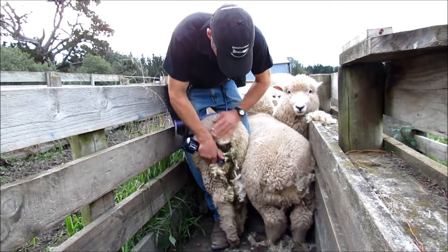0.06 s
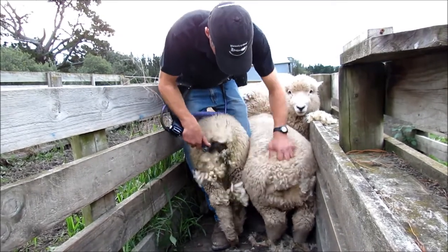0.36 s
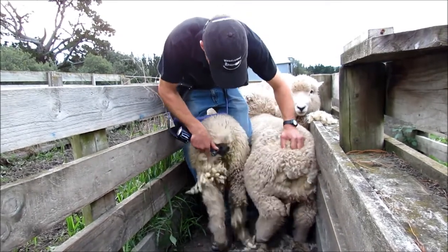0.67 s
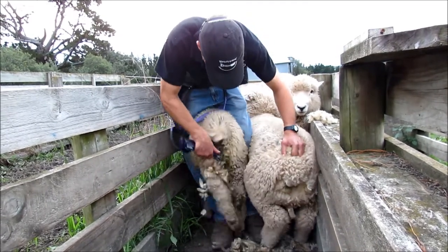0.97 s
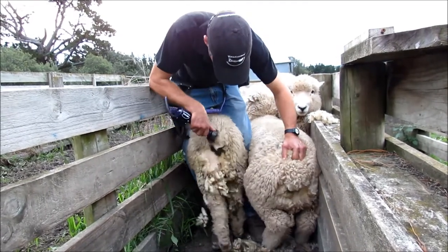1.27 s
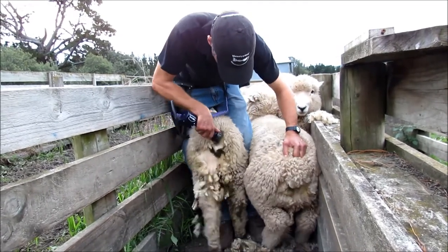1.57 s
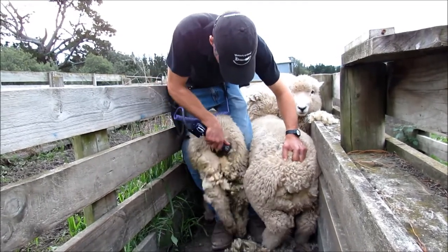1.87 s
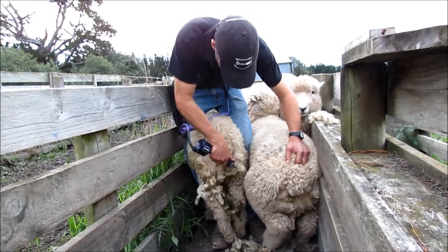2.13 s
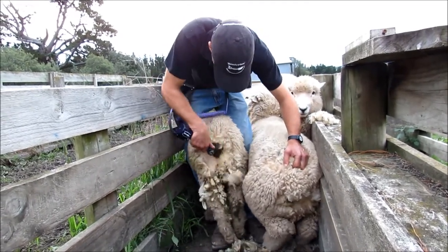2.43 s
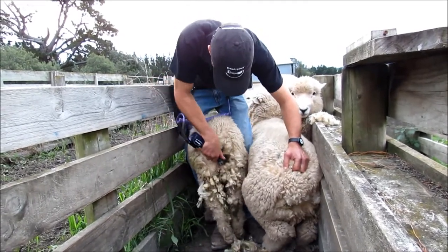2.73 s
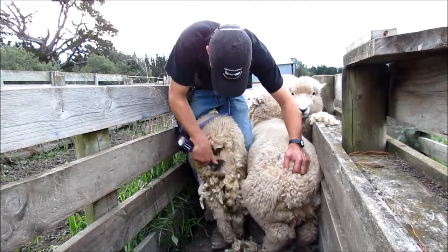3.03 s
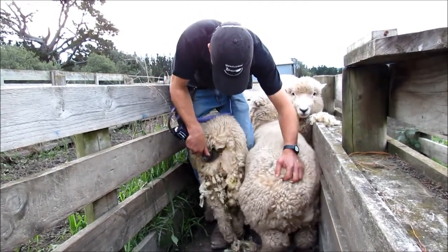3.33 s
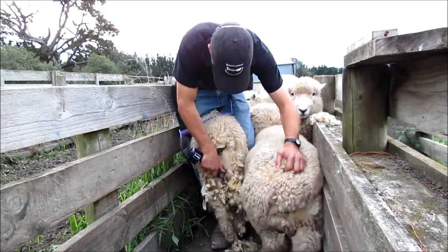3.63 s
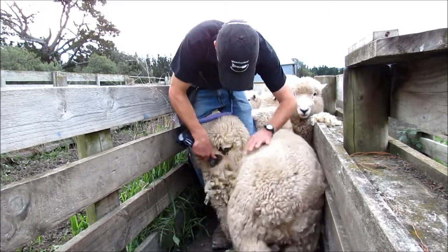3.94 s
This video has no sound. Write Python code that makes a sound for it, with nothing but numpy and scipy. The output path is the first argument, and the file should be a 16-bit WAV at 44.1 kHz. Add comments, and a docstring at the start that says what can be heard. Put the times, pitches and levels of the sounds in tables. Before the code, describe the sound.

An electric clipper buzzes and hisses steadily outdoors, rasping harshly at times as it bites into thick wool. After about a second come a sharp blade snap and a few thumps on wooden boards, while sheep shuffle faintly.

```python
"""Outdoor wooden sheep race: an electric clipper works through a fleece at about 48 strokes a second.
The cutter hisses over the comb and rings its teeth; thick wool slows the motor and adds harsh chatter.
The drive knocks at each reversal, the gears hum, and the blades snap twice.
Sheep thump the boards and shuffle. Behind: low rumble and one soft gust on the microphone."""
import sys
import numpy as np
from scipy import signal
from scipy.fft import rfft, irfft
from scipy.io import wavfile
from scipy.ndimage import map_coordinates

SR = 44100
rng = np.random.default_rng(int(sys.argv[2]) if len(sys.argv) > 2 else 0)


def unload_wav(signal):
    """Save mono or channel-first audio to the path in sys.argv[1] as 16-bit WAV at rate SR, clipped to [-1, 1]."""
    wavfile.write(
        sys.argv[1],
        SR,
        np.round(np.clip(np.atleast_2d(signal).T, -1, 1) * 32767).astype(np.int16),
    )


N = 176400
T = np.arange(N) / SR
HZ = np.fft.rfftfreq(N, 1 / SR)

# Motor speed. Each row: time in seconds, strokes per second.
STROKE_RATE = [(0, 48.3), (0.15, 49.1), (0.4, 48.3), (0.66, 48.7), (0.81, 47.5), (0.93, 49.6), (1.05, 48.5),
               (1.28, 48.2), (1.37, 48.8), (1.46, 48.1), (1.55, 48.5), (1.9, 48), (2.05, 49.1),
               (2.14, 50.1), (2.26, 48.4), (2.53, 48.25), (2.62, 48.8), (2.81, 47.1), (2.97, 52),
               (3.06, 50.4), (3.14, 48.2), (3.4, 48.5), (3.53, 48), (3.71, 49.35), (3.88, 48.15), (4, 48.8)]
# Moving handpiece. Each row: time in seconds, then relative hiss, comb ring and knock levels in dB.
HANDPIECE_LEVELS = [(0, -22.5, -33, -33), (0.16, -23, -28, -37.5), (0.33, -18, -21, -30.5),
                    (0.56, -19, -29, -34.5), (0.66, -21.5, -21, -32.5), (0.78, -20.5, -27, -37),
                    (0.89, -25, -30.5, -33.5), (1.0, -21.5, -26, -33.5), (1.15, -20.5, -23.5, -28),
                    (1.27, -22.5, -27.5, -33.5), (1.55, -23, -27, -31), (1.75, -21.5, -26.5, -34.5),
                    (1.95, -25.5, -32, -30), (2.17, -25.0, -33, -41.5), (2.37, -20.5, -25.5, -31),
                    (2.56, -22, -27, -31), (2.71, -23, -21, -30), (2.85, -25.5, -41, -49),
                    (2.97, -26, -32, -37), (3.1, -22, -27.5, -33.5), (3.35, -20.5, -24.4, -31.5),
                    (3.52, -22.5, -27, -40), (3.66, -23, -30, -31), (3.84, -19, -24.5, -31.5),
                    (4.0, -19.5, -26, -29)]
# Blade hiss. Each row: frequency in Hz, gain in dB.
HISS_SPECTRUM = [(400, -65), (620, -12), (760, -6), (1700, -8.5), (2050, -4.5), (2500, -6.5), (2900, -4),
                 (3300, -5.5), (3460, -15.5), (3600, -8), (3780, -7), (6400, -6.5), (7400, -3.5),
                 (10200, -1), (13400, -9), (16000, -11.5)]
# Left-right likeness of the hiss. Each row: frequency in Hz, correlation from 0 to 1.
HISS_CORRELATION = [(1000, 0.41), (2500, 0.12), (5000, 0.57), (8000, 0.04)]
# Comb modes, upper then lower. Each row: pole width in Hz, gain in dB, dB per dB of ring level change.
COMB_MODES = [(536, -3, 1.15), (368, -6, 0.81)]
# Comb modes shift under pressure on the fleece. Each row: time in seconds, upper and lower pitch in Hz.
COMB_PITCHES = [(0.0, 5500, 4540), (0.22, 5560, 4750), (0.36, 5100, 4670), (0.53, 5510, 4360),
                (0.61, 5180, 4860), (0.9, 5440, 4390), (2.76, 5210, 4590), (2.92, 5400, 4350),
                (3.14, 5260, 4750), (3.7, 5320, 4830), (4.0, 5220, 4870)]
# Bites into thick wool. Each row: start in seconds, length in seconds, level in dB.
WOOL_BITES = [(0.736, 0.15, -23.5), (1.706, 0.12, -30.5), (1.818, 0.3, -24), (2.662, 0.22, -23),
              (3.493, 0.14, -27.5)]
# Tearing wool. Each row: frequency in Hz, gain in dB.
TEAR_SPECTRUM = [(300, -13.5), (780, -7.5), (2850, -2.5), (6500, -5.5), (8100, 3), (14000, -9.5)]
# Cutter scrapes. Each row: start in seconds, length in seconds, level in dB, pitch in Hz.
COMB_SCRAPES = [(0.185, 0.2, -35.5, 2780), (2.74, .17, -37, 2750), (3.546, 1, -37, 2850)]
# Housing resonances. Each row: frequency in Hz, width in Hz, gain in dB.
HOUSING_MODES = [(751, 14, 0), (1011, 18.6, 3.5), (1202, 110, 2.5), (1712, 42, 5.5), (2110, 92, -2.5),
                 (2836, 79, 1.5)]
# Thumps on the boards. Each row: start in seconds, level in dB, main pitch in Hz, its T60 in seconds.
BOARD_THUMPS = [(1.126, -27, 324, 0.021), (1.261, -21, 346, 0.063), (1.264, -25, 385, 0.055),
                (1.546, -23, 365, 0.018), (1.579, -26, 168, 0.046)]
# Board resonances. Each row: multiple of the main pitch, gain in dB.
BOARD_MODES = [(.55, -13.5), (1, 2.5), (1.45, -0.5), (2.1, 0), (2.5, 1), (3.6, -0.5)]
# Snaps at the blades. Each row: start in seconds, level in dB.
BLADE_SNAPS = [(.815, -31), (1.199, -17)]
# Snap resonances. Each row: frequency in Hz, gain in dB, T60 in seconds.
SNAP_RESONANCES = [(935, 2, 0.016), (1780, 7, 0.0078), (2110, -2.5, 0.016), (2470, -7.5, 0.024),
                   (3050, -1.5, 0.019)]
# Hooves and bodies shuffling. Each row: peak time in seconds, level in dB.
SHEEP_SHUFFLES = [(.06, -39), (.67, -51), (1.115, -39.5), (1.6, -43), (1.98, -46), (2.08, -42),
                  (2.225, -39), (2.3, -41), (2.42, -45.5), (3.57, -41)]
# Outdoor rumble. Each row: frequency in Hz, gain in dB.
RUMBLE_SPECTRUM = [(20, -21), (85, 2.5), (130, -6), (205, -8.5), (265, -15), (350, -30), (520, -4),
                   (1500, -88)]
# Microphone balance. Each row: frequency in Hz, left minus right in dB.
MIC_BALANCE = [(60, -3), (2000, -3), (12000, -0.5)]

CATCH_AT_STROKES, CATCH_RISE_STROKES = 0.487, 0.025
HISS_REPEAT, RING_REPEAT, BUZZ_REPEAT = 0.31, 0.81, 0.8  # power share that recurs each stroke
HISS_GAIN_DB, RING_GAIN_DB, KNOCK_GAIN_DB, GRIT_GAIN_DB, RASP_GAIN_DB = -1.97, -2.5, -5, 19.5, -11.5
TIPS_DB, HUM_DB, RUMBLE_DB, GUST_DB = -34.5, -46, -46.5, -51
BODY_FOLLOW, TIPS_FOLLOW, HUM_FOLLOW = 0.14, 1.54, 1.22  # dB per dB of hiss level change
HUM_CYCLES_PER_STROKE, HUM_ROUGHNESS = 9, 0.44


def blades(turns):
    """The cutter rubs the comb, catching on each half stroke; turns counts strokes elapsed."""
    pulse = 1 + 0.56 * catch((turns - CATCH_AT_STROKES) % .5, fall_strokes=0.44)
    pulse *= amp(1.27 * drift(hz=710))
    rub, teeth, buzz = (pulse * np.array([friction(turns, repeat), friction(turns, repeat)])
                        for repeat in (HISS_REPEAT, RING_REPEAT, BUZZ_REPEAT))
    return blade_hiss(rub, buzz) + comb_ring(teeth)


def blade_hiss(rub, buzz):
    """Gritty friction hiss, buzzing at the low end, brighter when louder."""
    rub = rub + lowpass(buzz - rub, hz=2300)
    gritty = rub + amp(GRIT_GAIN_DB) * grit(per_s=70)
    hiss = unit(colour(spread(gritty, read(HISS_CORRELATION)), HISS_SPECTRUM))
    body = lowpass(hiss, hz=6500)
    treble = hiss - body
    body *= amp((BODY_FOLLOW - 1) * surge_db())  # offsets most of the level change below
    return (treble + body) * amp(HISS_GAIN_DB + curve(HANDPIECE_LEVELS, column=1))


def comb_ring(teeth):
    """Friction rings the tooth tips and the comb's two shifting modes."""
    tips = resonate(teeth, hz=8450, width_hz=590) * amp(TIPS_DB + TIPS_FOLLOW * surge_db())
    teeth = spread(teeth, correlation=0.66)
    comb = 0
    for column, (width_hz, db, follow) in enumerate(COMB_MODES, start=1):
        mode = resonate(teeth, curve(COMB_PITCHES, column), width_hz)
        comb += amp(db + follow * surge_db(column=2)) * mode
    return tips + comb * amp(RING_GAIN_DB + curve(HANDPIECE_LEVELS, column=2).mean())


def friction(turns, repeat, tracks=9, points=800):
    """Steel on steel: a slowly changing roughness met on every stroke, plus fresh noise."""
    roughness = signal.resample(rng.standard_normal((tracks, points)), points * 10, axis=1)
    position = (turns % 1 * points * 10).astype(int)
    progress = np.arange(N) / N * (tracks - 1)
    track, fade_rad = progress.astype(int), progress % 1 * np.pi / 2
    recurring = roughness[track, position] * np.cos(fade_rad)
    recurring += roughness[track + 1, position] * np.sin(fade_rad)
    return np.sqrt(repeat) * recurring + np.sqrt(1 - repeat) * rng.standard_normal(N)


def catch(phase_strokes, fall_strokes):
    """The teeth catch fast and let go gradually."""
    return (1 - np.exp(-phase_strokes / CATCH_RISE_STROKES)) * np.exp(-phase_strokes / fall_strokes)


def grit(per_s, decay_s=0.00076):
    """Fibre and dirt crack in the teeth: sparse, uneven noise bursts."""
    cracks = (rng.random(N) < per_s / SR) * amp(1.8 * np.minimum(rng.exponential(1, N), 3))
    envelope = signal.lfilter([1], [1, -np.exp(-1 / (decay_s * SR))], cracks)
    return envelope * rng.standard_normal((2, N)) / 4


def chatter(turns):
    """Thick wool tears once a stroke and the strained cutter rasps; at times it scrapes the comb."""
    bites = sum(amp(db) * arch(start_s, length_s) for start_s, length_s, db in WOOL_BITES)
    gate = 2 * catch((turns - CATCH_AT_STROKES) % 1, fall_strokes=0.47) * amp(2 * drift(hz=504))
    tear = unit(colour(stereo_noise(correlation=0.16), TEAR_SPECTRUM)) * gate
    rub = friction(turns, RING_REPEAT)
    rasp = resonate(rub, hz=781, width_hz=148) * amp(RASP_GAIN_DB)
    scrapes = sum(amp(db) * arch(start_s, length_s) * resonate(rub, hz, width_hz=230)
                  for start_s, length_s, db, hz in COMB_SCRAPES)
    return (tear + rasp) * bites + scrapes


def drive_knock(turns, return_gain=0.82, unevenness=0.3, side_delay_s=0.0014):
    """The crank knocks the housing one way, then the other."""
    half_stroke = np.floor(2 * turns + .5)
    knocks = np.diff(half_stroke, prepend=half_stroke[0]) * np.where(half_stroke % 2, 1, -return_gain)
    knocks *= 1 + unevenness * rng.standard_normal(N)
    housing = colour(ring(knocks, HOUSING_MODES), [(330, -76), (660, 3.5), (3000, -3.0), (3600, -7)])
    side = filtered(housing, np.exp(-2j * np.pi * HZ * side_delay_s))
    pair = unit(housing + np.array([[.5], [-.5]]) * side)
    return pair * amp(KNOCK_GAIN_DB + curve(HANDPIECE_LEVELS, column=3))


def gear_hum(turns):
    """The gears hum at a multiple of the stroke rate, swelling with the hiss."""
    tone = np.sqrt(2) * np.sin(2 * np.pi * HUM_CYCLES_PER_STROKE * turns + np.array([[.4], [0]]))
    pitch_hz = HUM_CYCLES_PER_STROKE * curve(STROKE_RATE, column=1)
    rough = resonate(rng.standard_normal(N), pitch_hz, width_hz=77)
    return (tone + HUM_ROUGHNESS * rough) * amp(HUM_DB + HUM_FOLLOW * surge_db())


def thumps(rise_s=0.00011):
    """Hooves and bodies strike the boards; higher modes die sooner."""
    wood, t = np.zeros(N), np.arange(SR // 4) / SR
    for start_s, db, hz, t60_s in BOARD_THUMPS:
        board = 0
        for ratio, mode_db in BOARD_MODES:
            decay = amp(mode_db - 60 * t * np.sqrt(ratio) / t60_s)
            board += decay * np.sin(2 * np.pi * (hz * ratio * t + rng.random()))
        add(wood, start_s, amp(db) * board * (1 - np.exp(-t / rise_s)))
    return rail_echoes(colour(wood, [(70, -13), (160, 1)]), echo_db=-7, t60_s=.12)


def snaps():
    """Something snaps in the blades and rings briefly."""
    mix, t = np.zeros(N), np.arange(SR // 4) / SR
    snap = sum(amp(db - 60 * t / t60_s) * np.sin(2 * np.pi * hz * t) for hz, db, t60_s in SNAP_RESONANCES)
    for start_s, db in BLADE_SNAPS:
        add(mix, start_s, amp(db) * snap)
    return rail_echoes(colour(mix, [(150, -11), (1400, 2)]), echo_db=-12, t60_s=.06)


def shuffles(peak_hz=175.5, half_width_s=0.021):
    """Hooves and bodies shift: short, soft puffs of low noise."""
    scuff = unit(filtered(stereo_noise(correlation=0.85), HZ ** 3 * np.exp(-3 * HZ / peak_hz)))
    return scuff * sum(amp(db) * bell(peak_s, half_width_s) for peak_s, db in SHEEP_SHUFFLES)


def rumble():
    """Low outdoor noise, wavering slowly."""
    return unit(colour(stereo_noise(correlation=0.33), RUMBLE_SPECTRUM)) * amp(RUMBLE_DB + drift(hz=1.1))


def gust(peak_hz=20):
    """One soft gust buffets the microphone."""
    wind = unit(filtered(rng.standard_normal((2, N)), HZ * np.exp(-HZ / peak_hz)))
    return wind * amp(GUST_DB) * bell(peak_s=3.33, half_width_s=0.13)


def near_reflections(pair, count=3, echo_db=-14, spacing_s=.0011, sway_s=.00005):
    """Reflections off arm and rail; delays drift as the hand moves, shifting the colour."""
    out = pair.copy()
    for k in range(count):
        delay_s = spacing_s * (k + rng.uniform(0.61, 1)) + sway_s * drift(hz=4.24)
        out += amp(echo_db) * np.array([map_coordinates(x, [(T - delay_s) * SR], order=3) for x in pair])
    return out / np.sqrt(1 + count * amp(echo_db) ** 2)


def rail_echoes(x, echo_db, t60_s, count=24):
    """Direct sound plus early echoes from the rails, different in each ear."""
    taps = np.zeros((2, N))
    for ear in taps:
        delay_s = rng.uniform(0.00113, 0.06, count)
        ear[(delay_s * SR).astype(int)] = rng.choice([-1, 1], count) * amp(-60 * delay_s / t60_s)
        ear *= amp(echo_db) / np.linalg.norm(ear)
    taps[:, 0] = 1
    return signal.fftconvolve(x[None], taps, axes=1)[:, :N]


def amp(db):
    """Decibels to gain."""
    return 10 ** (np.asarray(db) / 20)


def unit(x):
    """Scales the channel mean to rms 1."""
    return x / np.sqrt(np.mean(np.atleast_2d(x).mean(0) ** 2) + 1e-20)


def curve(table, column):
    """One column of a time table, at every sample."""
    rows = np.array(table)
    return np.interp(T, rows[:, 0], rows[:, column])


def surge_db(column=1):
    """A handpiece level above its mean; by default the hiss."""
    level_db = curve(HANDPIECE_LEVELS, column)
    return level_db - level_db.mean()


def arch(start_s, length_s):
    """Semi-elliptical swell."""
    return np.sqrt(np.maximum(1 - (2 * (T - start_s) / length_s - 1) ** 2, 0))


def bell(peak_s, half_width_s):
    """Gaussian swell; half width at 1/e."""
    return np.exp(-((T - peak_s) / half_width_s) ** 2)


def read(points):
    """A frequency table, at every bin."""
    hz, value = np.transpose(points)
    return np.interp(np.log(HZ + 1), np.log(hz + 1), value)


def filtered(x, response):
    """Applies a gain per bin."""
    return irfft(rfft(x) * response, N)


def lowpass(x, hz):
    """Steep treble cut."""
    return filtered(x, np.exp(-(HZ / hz) ** 4))


def colour(x, points):
    """Filters by points of frequency in Hz, gain in dB."""
    return filtered(x, amp(read(points)))


def ring(x, modes):
    """Bank of damped resonances."""
    return filtered(x, sum(amp(db) * 1j * HZ * width_hz / (hz * hz - HZ ** 2 + 1j * HZ * width_hz)
                           for hz, width_hz, db in modes))


def resonate(x, hz, width_hz):
    """Double-pole resonance that can follow a moving pitch; width per pole, rms 1."""
    carrier = np.exp(2j * np.pi * np.cumsum(hz * np.ones(N)) / SR)
    pole = np.exp(-np.pi * width_hz / SR)
    return unit((carrier * signal.lfilter([1], [1, -2 * pole, pole * pole], x / carrier)).real)


def drift(hz):
    """Random fluctuation up to about hz; rms 1."""
    return unit(filtered(rng.standard_normal(N), np.exp(-(HZ / hz) ** 2)))


def spread(pair, correlation):
    """Blends two unrelated signals into correlated left and right."""
    a, b = rfft(pair)
    mid, side = a * np.sqrt(1 + correlation), b * np.sqrt(1 - correlation)
    return irfft(np.array([mid + side, mid - side]), N)


def stereo_noise(correlation):
    """White noise, left and right."""
    return spread(rng.standard_normal((2, N)), correlation)


def add(mix, start_s, sound):
    """Mixes a sound in at a time."""
    part = mix[round(start_s * SR):][:len(sound)]
    part += sound[:len(part)]


def scene():
    """Clipper on one motor speed, then sheep and outdoor air."""
    turns = np.cumsum(curve(STROKE_RATE, column=1)) / SR
    clipper = near_reflections(blades(turns) + chatter(turns)) + drive_knock(turns) + gear_hum(turns)
    return clipper + thumps() + snaps() + rumble() + shuffles() + gust()


def record(dry):
    """Microphone balance and band limit."""
    tilted = filtered(dry, amp(np.array([[.5], [-.5]]) * read(MIC_BALANCE)))
    band_limit = signal.firwin(511, cutoff=15950, window=("kaiser", 9), fs=SR)
    return signal.oaconvolve(tilted, band_limit[None], "same")


dry = scene()
out = record(dry)
unload_wav(out)
```